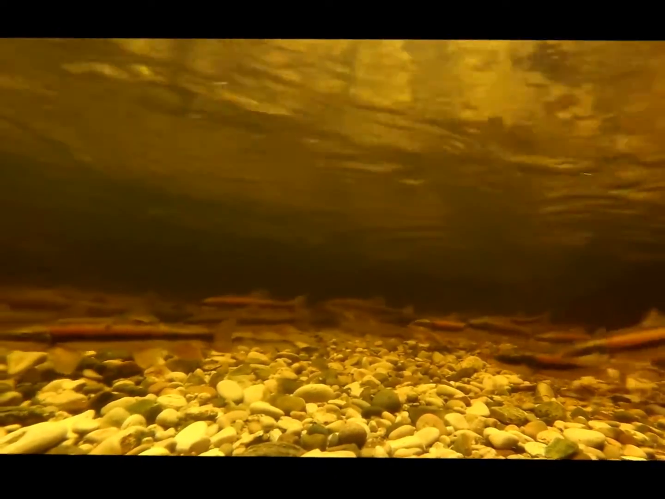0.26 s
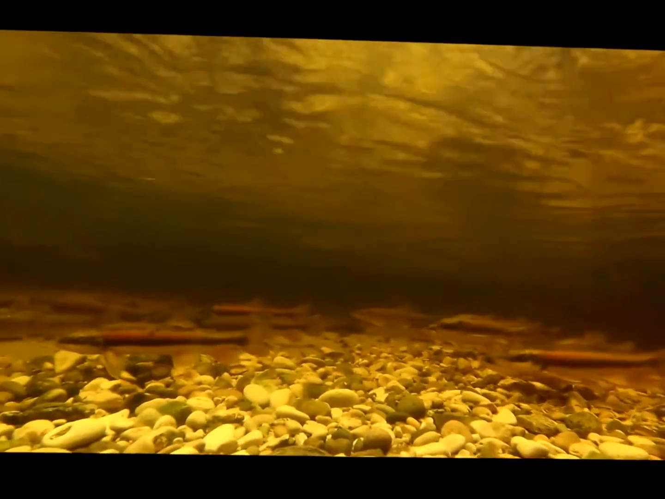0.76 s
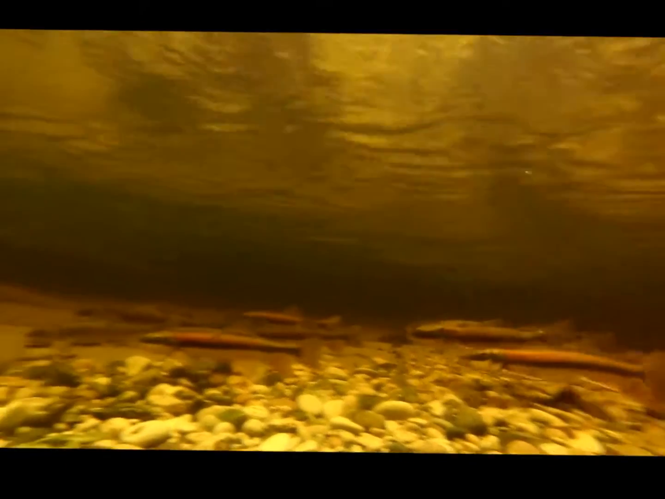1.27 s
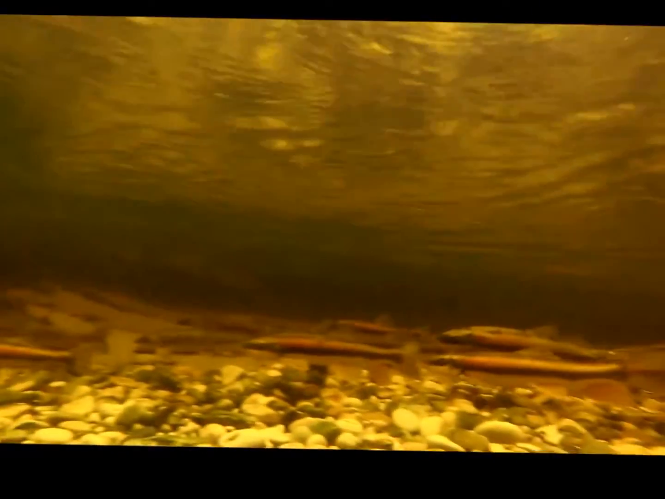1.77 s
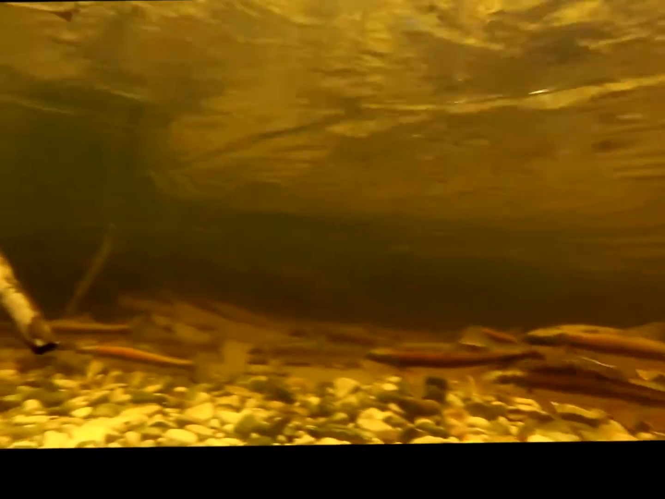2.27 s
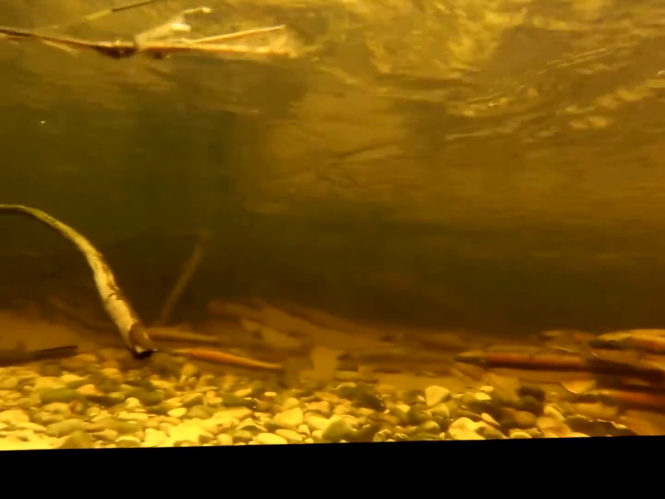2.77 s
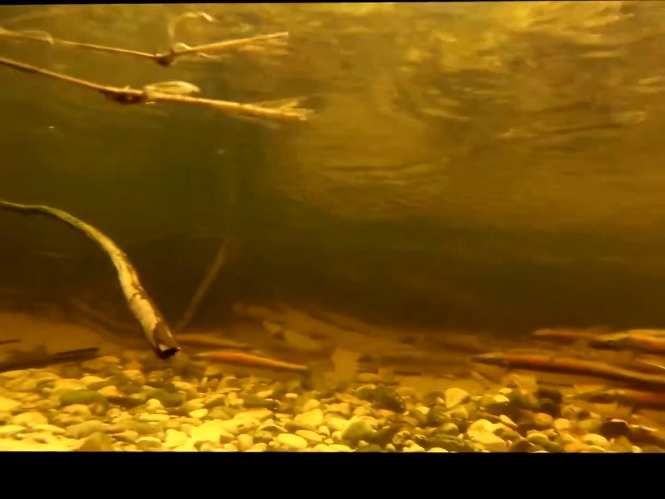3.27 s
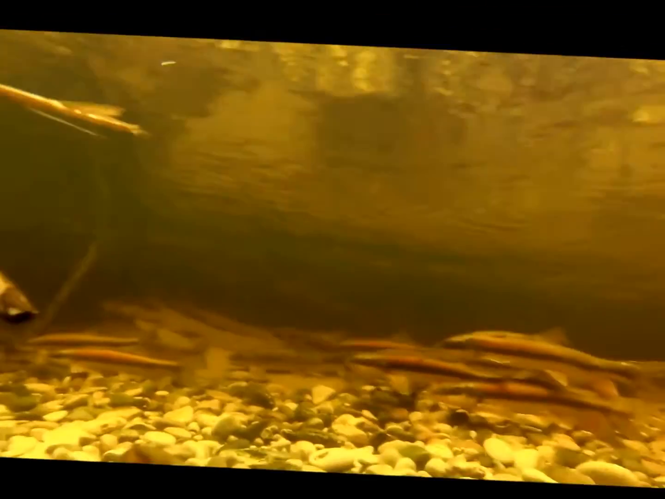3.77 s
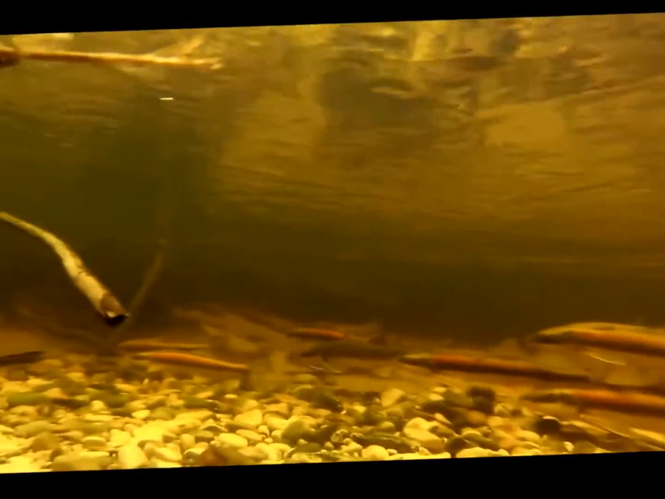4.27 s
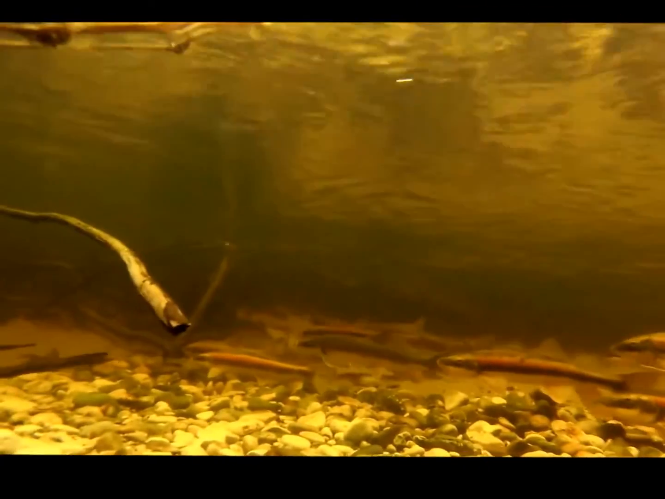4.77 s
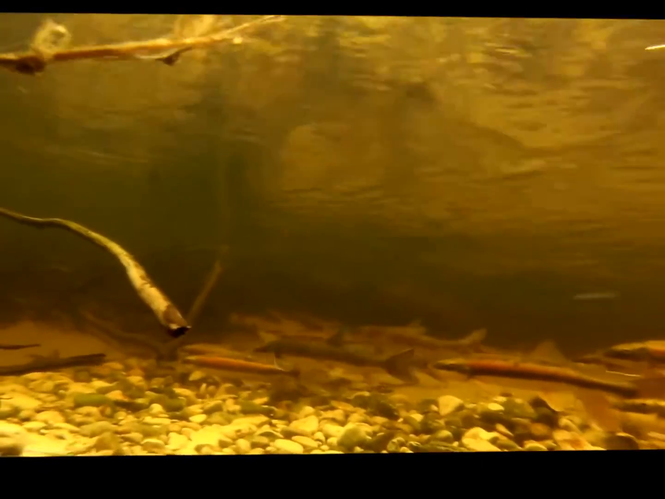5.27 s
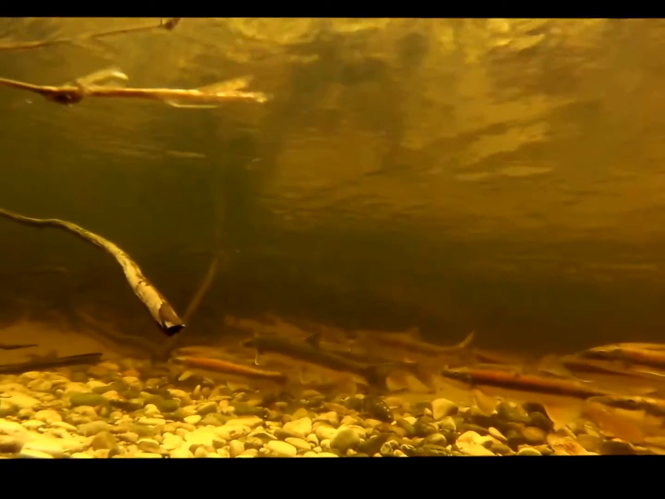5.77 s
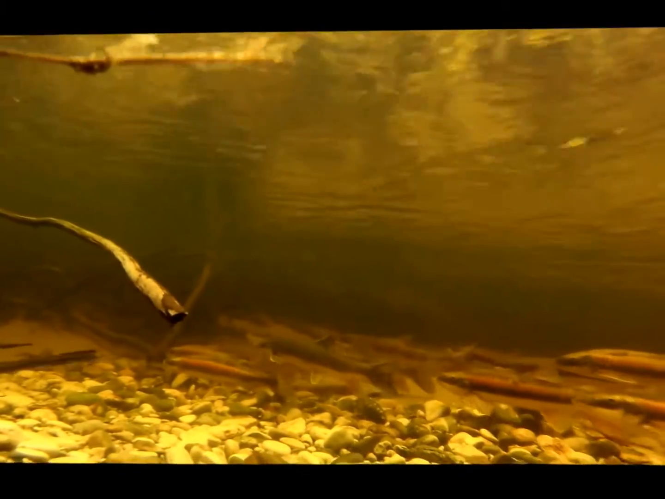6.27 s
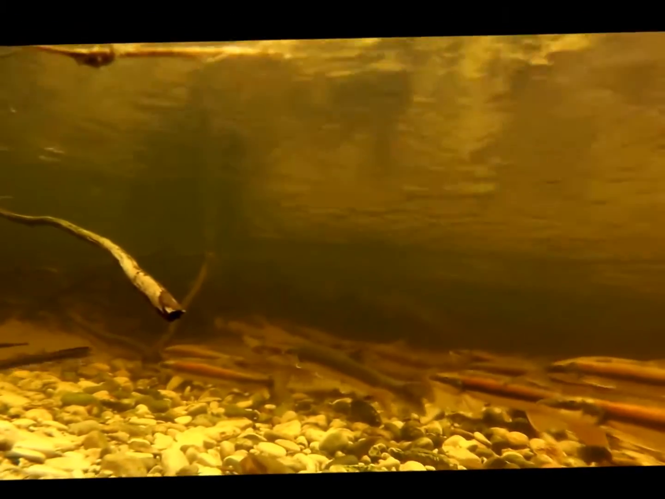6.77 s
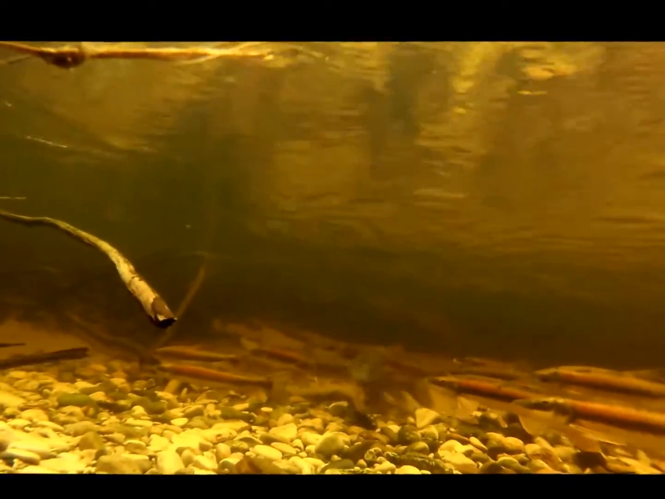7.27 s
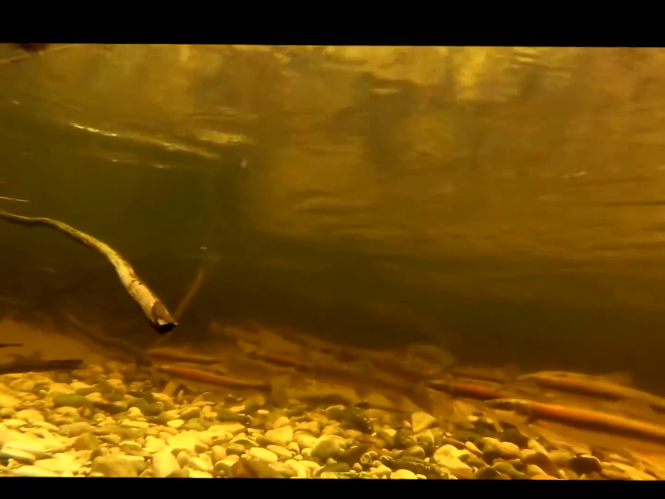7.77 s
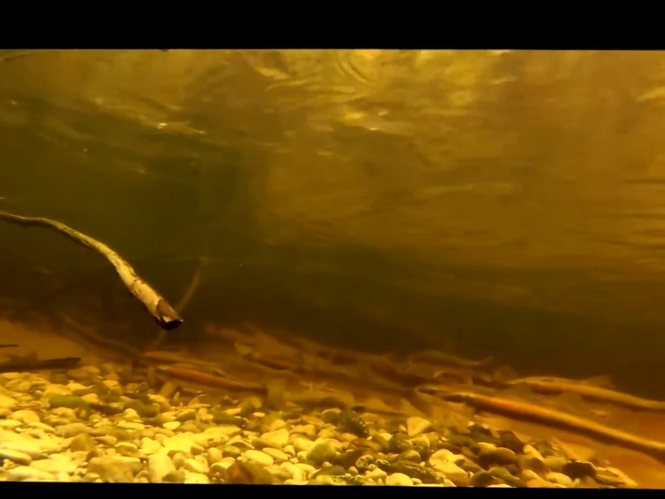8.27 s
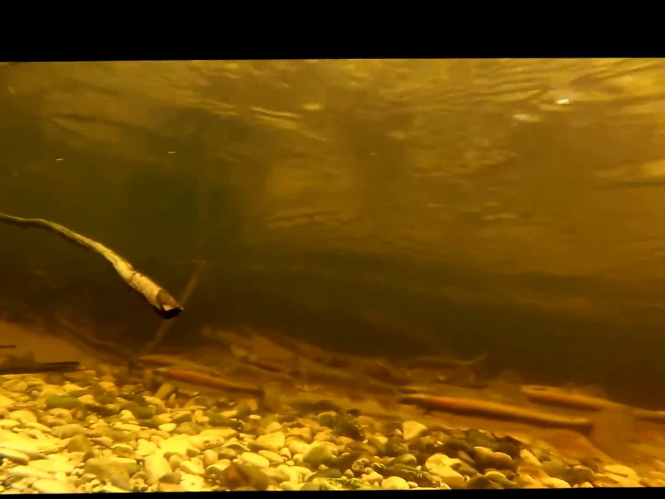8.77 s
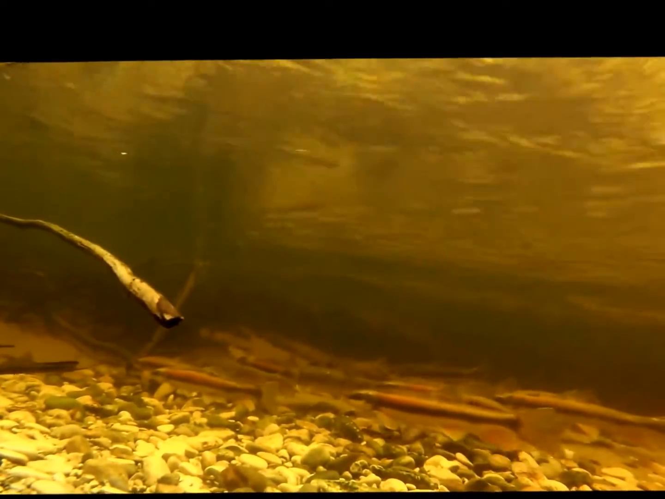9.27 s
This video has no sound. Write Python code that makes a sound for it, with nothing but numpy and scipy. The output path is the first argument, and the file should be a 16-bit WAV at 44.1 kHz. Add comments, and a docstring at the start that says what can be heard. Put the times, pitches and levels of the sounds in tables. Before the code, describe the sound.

Underwater, gravel grinds and clicks on a plastic housing in uneven bursts while the current thumps softly.

```python
"""Pebbles knock and grit scrapes on the plastic housing of a camera pushed about on a creek bed.
Each contact is an impulse that excites the damped modes of the shell, and the water displaced
by a knock answers with a short, sinking plop. The current thumps softly on the housing and
rocks it, over the faint hiss of the microphone."""
import sys
import numpy as np
from scipy import signal
from scipy.fft import rfft, irfft
from scipy.io import wavfile
from scipy.ndimage import uniform_filter1d

SR = 44100
rng = np.random.default_rng(int(sys.argv[2]) if len(sys.argv) > 2 else 0)


def wav_out(sig):
    """Save sig, one row per channel (or a flat mono array), as 16-bit PCM at SR to the path in sys.argv[1]."""
    wavfile.write(sys.argv[1], SR, np.round(np.clip(np.atleast_2d(sig).T, -1, 1) * 32767).astype(np.int16))


N = 420713


def gain_of(db):
    return 10 ** (np.asarray(db) / 20)


def unit_rms(x):
    return x / np.sqrt(np.mean(x ** 2) + 1e-20)


def noise(spectrum):
    """Spectral shaping: white noise is weighted by a curve of (Hz, dB) points."""
    corner_hz, corner_db = np.transpose(spectrum)
    hz = np.fft.rfftfreq(N, 1 / SR)
    db = np.interp(np.log(hz + 1), np.log(corner_hz + 1), corner_db)
    return unit_rms(irfft(rfft(rng.standard_normal(N)) * gain_of(db), N))


def envelope_db(start, held, swell_db_per_s, fade_db_per_s, top_db, rest_db):
    """Incoherent addition: events that swell, hold and fade add their power to a resting level."""
    hop = 64
    t = np.arange(0, N + hop, hop)[:, None] / SR
    before, after = np.maximum(start - t, 0), np.maximum(t - start - held, 0)
    gains = gain_of(top_db - swell_db_per_s * before - fade_db_per_s * after)
    db = 10 * np.log10((gains ** 2).sum(axis=1) + gain_of(2 * rest_db))
    return np.interp(np.arange(N) / hop, np.arange(len(db)), db)


def hiss():
    """Self-noise: the microphone adds a steady broadband floor."""
    spectrum = [(100, -18), (300, 7.5), (2500, -2), (3000, 0.5), (8000, -7.5), (13500, -9.5),
                (15500, -23.5)]
    return gain_of(-71) * noise(spectrum)


# Spectrum of the rocking housing. Each row: frequency in Hz, relative density in dB.
ROCKING_SPECTRUM = [(5, -50), (14, -6.5), (26, 16), (38, -8.5), (55, -27), (120, -120)]
# Strength of the rocking. Each row: time in seconds, level in dB.
ROCKING_LEVELS = [(0.0, -51), (0.32, -39), (0.34, -47.5), (1.22, -39), (1.27, -26.5), (1.59, -22.5),
                  (2.07, -39), (2.68, -45.5), (2.82, -31.5), (2.9, -44), (2.97, -34), (3.53, -50.5),
                  (3.77, -43.5), (3.85, -50), (4.25, -35), (4.36, -46), (4.94, -53), (5.1, -25),
                  (5.23, -49), (8.18, -56), (8.58, -48), (9.54, -59.5)]


def rocking():
    """Rigid-body motion: the whole housing sways in the current and gives a deep rumble."""
    level_db = np.interp(np.arange(N) / SR, *np.transpose(ROCKING_LEVELS))
    return gain_of(level_db) * noise(ROCKING_SPECTRUM)


# Spectra of a slap's thump, its fuller gulp and the steady lapping.
# Each row: frequency in Hz, relative density in dB.
THUMP_SPECTRUM = [(20, -67), (35, -4.5), (55, 8), (100, 6), (140, -9), (220, -32.5), (500, -120)]
GULP_SPECTRUM = [(60, -39), (130, -1), (250, -3.5), (450, 1), (900, -59)]
LAPPING_SPECTRUM = [(25, -35), (45, 7.5), (70, 3), (120, -10), (200, -16), (400, -38.5)]
# Slaps of water. Each row: start in seconds, hold in seconds, level in dB, gulp in dB above that level.
WATER_SLAPS = [(0.185, 0.044, -37, -6.5), (0.502, 0.059, -43, -9), (1.077, 0.053, -37.5, 0),
               (1.195, 0.027, -38, -20), (1.246, 0.07, -34.5, -13), (1.357, 0.077, -46, -24),
               (1.52, 0.045, -43, -18), (1.66, 0.057, -50, -19), (2.0, 0.06, -57, -14),
               (2.11, 0.05, -50, -10), (2.18, 0.055, -45.5, -3), (2.55, 0.061, -43, -12),
               (2.65, 0.085, -41, -19), (2.78, 0.028, -32.5, -19), (2.837, 0.06, -35, -1),
               (2.95, 0.014, -29, -16), (2.985, 0.03, -32, -10.5), (3.093, 0.052, -40, -17.5),
               (3.37, 0.041, -45, -1), (3.583, 0.07, -36, -3.5), (3.705, 0.038, -43, -23),
               (4.14, 0.1, -41, -14), (4.235, 0.12, -46.5, -4), (5.04, 0.072, -34, -13.5),
               (5.13, 0.03, -49, -16), (5.236, 0.04, -40, -7), (6.488, 0.03, -43.5, -5),
               (6.753, 0.037, -44.5, -10.5), (8.38, 0.045, -41, -17), (8.856, 0.033, -46, -14)]


def current():
    """Pressure fluctuation: water slaps and laps at the shell and is stirred as the shell is shoved."""
    start, held, db, gulp_db = np.transpose(WATER_SLAPS)
    shape = dict(swell_db_per_s=899.5, fade_db_per_s=297, rest_db=-100)
    slaps = gain_of(envelope_db(start, held, top_db=db, **shape))
    gulps = gain_of(envelope_db(start, held, top_db=db + gulp_db, **shape))
    stirring = gain_of(grinding_db() - 11.5)
    thumps = np.hypot(slaps, stirring) * noise(THUMP_SPECTRUM)
    return thumps + gulps * noise(GULP_SPECTRUM) + gain_of(-57) * noise(LAPPING_SPECTRUM)


# Modes of the shell, in five families from low to high.
# Each row: frequency in Hz, relative gain in dB, time to decay by 60 dB in seconds.
LOW_MODES = [(191, -33.5, 0.047), (302, -24, 0.11), (422, -7, 0.057), (495.3, 5.5, 0.039),
             (615.7, 11.5, 0.023), (707, 7.5, 0.033)]
MIDDLE_MODES = [(945, -2.5, 0.02), (1084.4, 2.5, 0.03), (1157, -8, 0.039)]
UPPER_MODES = [(1556, -13.5, 0.013), (1655, 14, 0.013), (2046, 7.5, 0.013), (2202, 11, 0.018),
               (2161, -12.5, 0.027)]
BRIGHT_MODES = [(2954, 0, 0.016), (3346, 10, 0.0065), (3530, -4, 0.0085)]
TREBLE_MODES = [(4300, -4.5, 0.0023), (5320, 4.5, 0.0049), (6500, 3, 0.0045), (7300, -2.5, 0.0032),
                (9440, -5.5, 0.0035), (11300, -27.5, .005), (12400, -33, .004)]


def ring(force, hz, db, t60):
    """Damped resonance: a mode answers every impulse with an exponentially decaying sine."""
    radius, angle = 10 ** (-3 / (t60 * SR)), 2 * np.pi * hz / SR
    feedback = [1, -2 * radius * np.cos(angle), radius * radius]
    return signal.lfilter([0, gain_of(db) * radius * np.sin(angle)], feedback, force)


def softened(x, modes, reach=1.228):
    """Band limiting: contact takes time and the shell floats, so little sounds outside a mode family."""
    edges_hz = [modes[0][0] / reach ** 2, min(modes[-1][0] * reach, SR / 2 - 2000)]
    return signal.sosfilt(signal.butter(2, edges_hz, "bandpass", fs=SR, output="sos"), x)


# Shoves over grit. Each row: start of full pressure in seconds, hold in seconds,
# swell and fade in dB per second, relative level in dB, dullness in dB.
GRIT_SHOVES = [(0.0, 0.017, 100., 80, -61.5, 1), (0.15, 0.031, 702, 52, -50, 7.5),
               (0.27, 0.085, 128, 158, -47, 1.5), (0.47, 0.14, 121, 250., -43.5, 1.5),
               (0.72, 0.015, 300., 187, -52.5, 0.), (1.062, .08, 141, 300., -39, -0.5),
               (1.192, .12, 300., 250., -35.5, 1.), (1.39, 0.27, 250., 41, -36, 0),
               (1.96, 0.12, 72, 27.5, -34, -1), (2.3, 0.069, 100., 63, -45, 2.5),
               (2.56, 0.16, 20, 402, -38.5, 2), (2.83, 0.042, 300., 152, -49.5, 4.5),
               (2.95, 0.073, 150., 32.5, -53.5, 2), (3.37, 0.022, 90, 54, -57, 8.5),
               (3.599, 0.13, 218.5, 128, -35.5, 2), (4.0, 0.038, 94.5, 100., -47.5, -3),
               (4.121, 0.12, 142, 163, -33.5, -2.5), (4.27, 0.021, 99, 305, -47, 8.5),
               (4.57, 0.031, 36.5, 41, -47.5, 4), (4.8, 0.13, 66, 47, -46.5, 1.5),
               (5.058, 0.19, 498, 68, -39, 1.5), (5.68, 0.013, 150., 129, -60, 0),
               (5.86, 0.022, 157, 72, -60, 4), (6.1, 0.14, 34.5, 52, -56.5, -1.5),
               (6.45, 0.16, 50., 61, -51, 0.5), (6.8, 0.089, 94.5, 44, -61, -4),
               (7.42, .27, 35.5, 81, -55, -2.), (8.261, 0.19, 200., 50, -48, 1.5),
               (8.85, 0.064, 164, 81, -57.5, -1), (9.03, 0.14, 97, 27.5, -69, 0.)]


def grinding_db(dull_share=0.):
    """Spectral tilt: the grinding follows each shove's level plus a share of its dullness."""
    *shape, top_db, dull_db = np.transpose(GRIT_SHOVES)
    return envelope_db(*shape, top_db + dull_share * dull_db, rest_db=-77)


def grit(grains_per_s=2500, spread_db=4, place_db=7.5, family_db=2, rub=0.69):
    """Friction as random excitation: clumps of uneven grains and a fine rubbing drive the modes."""
    low_db, middle_db, high_db = grinding_db(0.7), grinding_db(), grinding_db(-0.53)
    light_db = np.minimum(high_db + 55.5, 0)  # light rubbing excites the high modes ever less
    families = ((LOW_MODES, low_db), (MIDDLE_MODES, middle_db - 3), (UPPER_MODES, middle_db - 0.5),
                (BRIGHT_MODES, high_db - 11.5 + .3 * light_db),
                (TREBLE_MODES, high_db - 21.5 + .6 * light_db))
    clumps = unit_rms(uniform_filter1d(uniform_filter1d(rng.standard_normal(N), 500), 500))
    hits = np.flatnonzero(rng.random(N) < grains_per_s * gain_of(3.5 * clumps) / SR)
    count, out = len(hits), np.zeros(N)
    size = gain_of(spread_db * np.minimum(rng.exponential(1, count), 4) + 0.82 * clumps[hits])
    for modes, db in families:
        rubbing = rub * (modes[0][0] / 1000) ** -.2 * gain_of(3 * clumps) * rng.standard_normal(N)
        grains = size * gain_of(family_db * rng.standard_normal(count)) * rng.choice([-1, 1], count)
        ringing = 0
        for mode in modes:
            force = rubbing.copy()
            force[hits] += grains * gain_of(place_db * rng.standard_normal(count))
            ringing += ring(force, *mode)
        out += gain_of(db) * unit_rms(softened(ringing, modes))
    return out


# Sharp treble ticks: the bright click of some pebble knocks, and light ticks between them.
# Each row: time in seconds, nominal peak level in dB.
TREBLE_TICKS = [(3.475, -41.5), (3.8247, -41), (4.0931, -45), (4.132, -32), (4.1816, -26), (4.2306, -30),
                (4.2544, -40), (4.314, -34), (4.7633, -24), (4.8173, -34), (4.9182, -41), (5.0928, -47),
                (5.108, -32), (5.1816, -45), (5.2086, -37), (5.236, -35), (6.7479, -11.5), (7.1561, -45),
                (7.2784, -46), (7.3667, -47), (7.3861, -51), (7.5834, -31), (8.2676, -48), (8.3805, -15),
                (8.505, -51), (8.9376, -47)]


def ticks():
    """Impulse response: each tick is a brief ringing of the treble modes, in its own proportions."""
    start, db = np.transpose(TREBLE_TICKS)
    coupling = gain_of(2.5 * rng.standard_normal((len(start), len(TREBLE_MODES))))
    out = np.zeros(N)
    for k, mode in enumerate(TREBLE_MODES):
        force = np.zeros(N)
        force[(start * SR).astype(int)] = gain_of(db) * coupling[:, k]
        out += ring(force, *mode)
    unit_tick = sum(ring(signal.unit_impulse(200), *mode) for mode in TREBLE_MODES)
    return softened(out, TREBLE_MODES) / abs(softened(unit_tick, TREBLE_MODES)).max()


def plops(start_hz=651.5, end_hz=199.4, fall_s=.012, attack_s=0.0056, t60=0.075):
    """Damped oscillation: water displaced by each knock gives a randomly detuned tone that sinks."""
    t, out = np.arange(4000) / SR, np.zeros(N + 4000)
    detunings = rng.uniform(0.786, 1.225, len(PEBBLE_KNOCKS))
    for (start, blow_db, low_db, *_), detuning in zip(PEBBLE_KNOCKS, detunings):
        hz = detuning * (end_hz + (start_hz - end_hz) * np.exp(-t / fall_s))
        tone = np.sin(2 * np.pi * np.cumsum(hz) / SR) * np.minimum(t / attack_s, 1)
        out[round(start * SR):][:len(t)] += gain_of(blow_db + low_db - 9.5 - 60 * t / t60) * tone
    return out[:N]


# Pebbles striking the shell. Each row: start in seconds, relative level of the blow in dB,
# then the levels of the low, upper and bright modes in dB above the blow.
PEBBLE_KNOCKS = [(0.141, -37, 5.5, -3, -16), (0.274, -33, 9.5, 10, -7), (0.3194, -32, 4, 9.5, 0),
                 (0.3635, -35, 4, 14, 2), (0.467, -28.5, -3, -3, -2.5), (0.6108, -27, 0, -2, -12),
                 (0.8103, -40, 6, 10, 11), (0.8518, -34.5, 8.5, 3, -7), (0.9638, -39.5, 8, 11, 9),
                 (1.0522, -35, -17, 18, -17), (1.062, -28, 9, 17, -7), (1.0788, -15.5, 0.5, 3.5, -8),
                 (1.1278, -19.5, 6.5, -4, -10), (1.1929, -12, 2.5, -7, -13), (1.2035, -10, -0.5, 3, -10),
                 (1.2191, -12.5, -2.5, -7, -10), (1.2574, -19, -2, 9, -1), (1.268, -24, 10, 10, 4.5),
                 (1.286, -10.5, -11, 1.5, -18), (1.3023, -12, -0.5, 0, -10), (1.3658, -15, -6, 0.5, -24),
                 (1.4177, -15.5, -19, 6.5, -4), (1.4486, -19.5, -11, 8.5, -21), (1.517, -18, -7, -2, -8),
                 (1.584, -25.5, 1, 8, -7), (1.6901, -28, 8.5, 10, -6), (1.728, -22.5, 1, 9.5, -10),
                 (1.8605, -25, 4, 13, 2), (1.9502, -46, 14, 8, 17), (1.9868, -8.5, -2, -0.5, -22),
                 (2.0138, -19, 0, 1, -2), (2.0589, -23, 7.5, 7.5, 4.5), (2.1984, -16.5, -7, 1, -2),
                 (2.2976, -27.5, 6, -2, 5), (2.3348, -30, 11.5, 5, 5), (2.4547, -24.5, 10, 8, -18),
                 (2.603, -17, -4, -5, -10), (2.655, -18.5, 1.5, -2, -3), (2.687, -23.5, -1, 2, 3),
                 (2.6946, -15.5, -1, 0.5, 0), (2.785, -27, -3.5, 5.5, -22), (2.8398, -37.5, 15, 8, -14),
                 (2.9388, -24, 3, 1, -13), (2.9872, -34.5, 10, 4, -17), (3.0959, -40.5, 12, 8, -4),
                 (3.571, -20, -6, 1, -10), (3.5937, -9, 4.5, 1.5, -11), (3.5987, -2, -20, -4, -12),
                 (3.6127, -28, 10, -11, -18), (3.6386, -5, 0.5, 0, -9.5), (3.7874, -20.5, -6, 5, -11),
                 (3.9708, -23.5, -3.5, -0.5, -21), (4.1089, -18.5, -9, -9, -23), (4.147, -18, -1.5, 1, -6),
                 (4.1724, -12.5, -1.5, -2, -12), (4.1807, -15, 1, 3, -15), (4.275, -25, 6, -1, -4),
                 (4.326, -30, 3, 5, 6), (4.5323, -38, 12.5, 13, -9), (4.6443, -31, 1, 8.5, -11),
                 (4.7514, -36, 7, 7.5, -1), (4.8117, -34, 11, 17, 5), (5.043, -10.5, 5.5, 9.5, -8),
                 (5.0615, -23.5, 12, 6, -4), (5.1294, -21.5, -3, 1, -3), (5.145, -24, 0, -1, -11),
                 (5.2476, -21.5, -3.5, 2, -20), (5.2857, -18.5, -5, 4.5, -9), (5.3076, -26, 4, 7, -2),
                 (5.3232, -29.5, 4, 6.5, 2), (5.4487, -33, -12, -8, -11), (5.4908, -44.5, 7, 10, 0),
                 (5.5477, -25.5, 4.5, 1.5, -13), (5.5788, -37.5, 3.5, 0, -4),
                 (6.0564, -27, -0.5, 3.5, -1.5), (6.163, -30.5, 3.5, 3, -4.5), (6.2265, -30.5, -1.5, 5, -1),
                 (6.4133, -33.5, 2, 7.5, 3.5), (6.4715, -30.5, 7, -2, -6), (6.4992, -23, 2.5, 2, -5),
                 (6.544, -23, 5, 6, -5), (6.6946, -33, -4, 3, -5), (6.721, -33.5, -1, 3, -3),
                 (6.7457, -3, -3, 3, -8.5), (6.812, -35, -4, 4, -7), (7.265, -25.5, -0.5, 8.5, -10),
                 (7.31, -36.5, 5.5, 11, -11), (7.4393, -39.5, 3, 8, -2), (7.533, -42, -1, 3, -5),
                 (7.5854, -21, -4.5, 2.5, -6), (7.694, -38, -5, 4, -16), (8.143, -50.5, 5, 2, -5),
                 (8.167, -46.5, 4, 3, 2), (8.333, -31.5, 0, 1, 2), (8.381, -4.5, -0.5, -1, -14.5),
                 (8.4418, -32, 7.5, 7, -14), (8.6739, -24, -1, 1, -7), (8.7365, -50.5, -9, 22.5, 14),
                 (8.851, -29.5, 12, 3, -15), (9.029, -46.5, 11.5, 11.5, -4)]


def knocks(bounce_s=0.000876, place_db=3):
    """Modal superposition: a blow and its dying bounces ring each mode, weighted by where it lands."""
    length = 3000
    out = np.zeros(N + length)
    for start, blow_db, low_db, upper_db, bright_db in PEBBLE_KNOCKS:
        bounce_at = (np.cumsum(rng.uniform(.4, 1.664, 6)) * bounce_s * SR).astype(int)
        bounces = 2 * rng.random(6) - 1
        families = ((LOW_MODES, low_db, .8), (MIDDLE_MODES, 0, .8), (UPPER_MODES, upper_db, .75),
                    (BRIGHT_MODES, bright_db, .65), (TREBLE_MODES, bright_db - 7.5, .55))
        for modes, db, bounce_decay in families:
            force = -signal.unit_impulse(length)
            force[bounce_at] = bounces * bounce_decay ** np.arange(1, 7)
            ringing = sum(gain_of(place_db * rng.standard_normal()) * ring(force, *m) for m in modes)
            knock = softened(ringing, modes)
            out[round(start * SR):][:length] += gain_of(blow_db + db) * knock / abs(knock).max()
    return out[:N]


def scene():
    """Linear superposition: shell, water and hiss add in one channel."""
    shell = gain_of(-1) * knocks() + gain_of(2.5) * grit() + ticks()
    return (shell + plops() + current() + rocking() + hiss())[None]


def record(dry):
    """Saturation and band limiting: peaks are cut at full scale, then the top treble is removed."""
    lowpass = signal.firwin(511, cutoff=15900, window=("kaiser", 9), fs=SR)
    return signal.oaconvolve(np.clip(dry, -1, 1), lowpass[None], "same")


dry = scene()
out = record(dry)
wav_out(out)
```